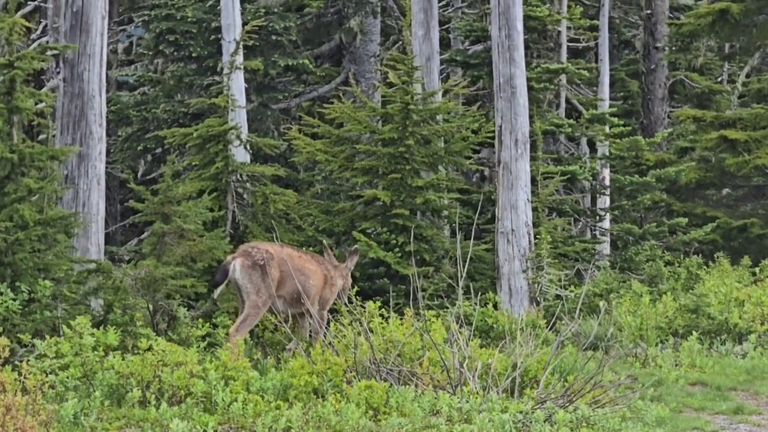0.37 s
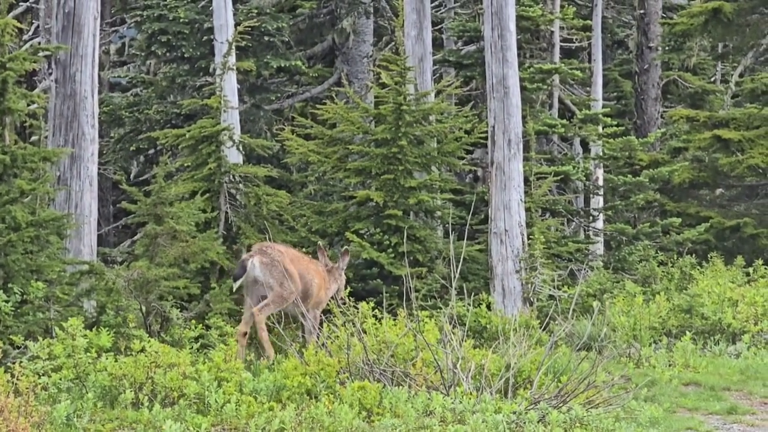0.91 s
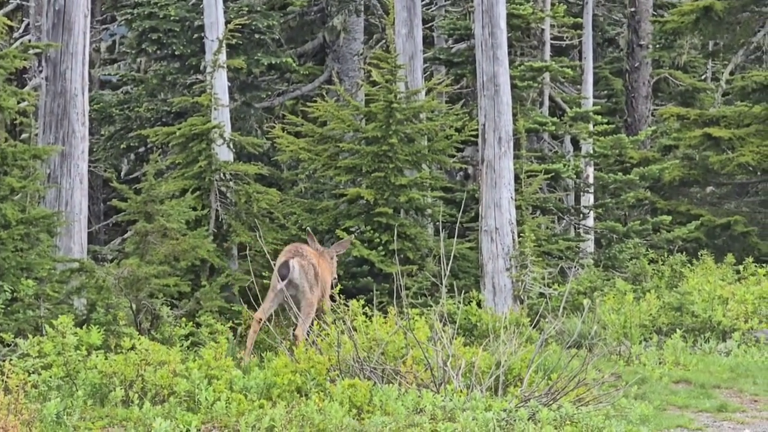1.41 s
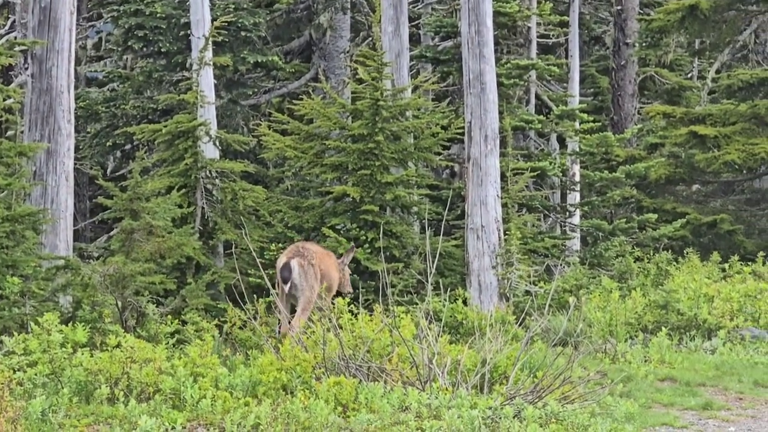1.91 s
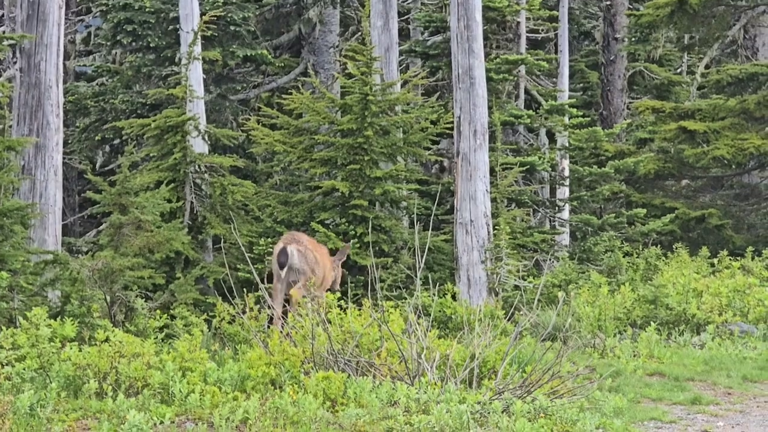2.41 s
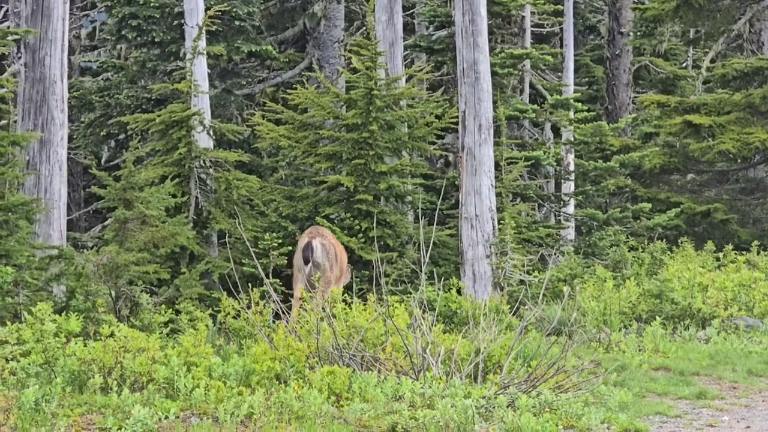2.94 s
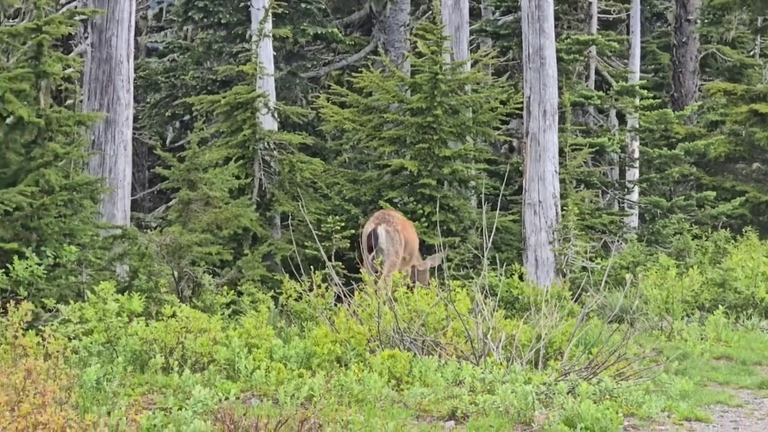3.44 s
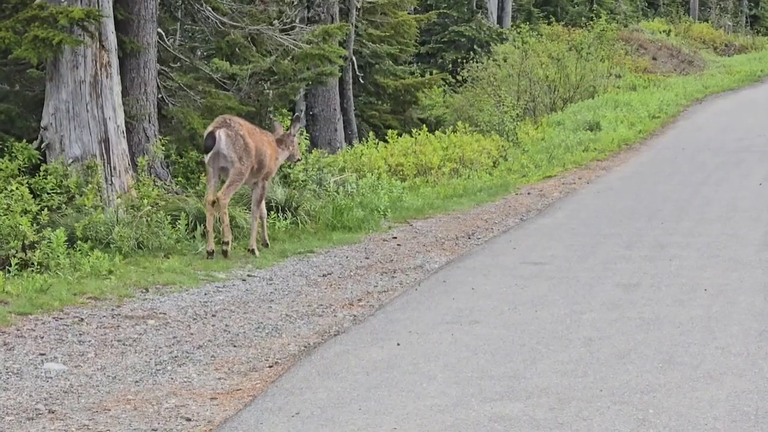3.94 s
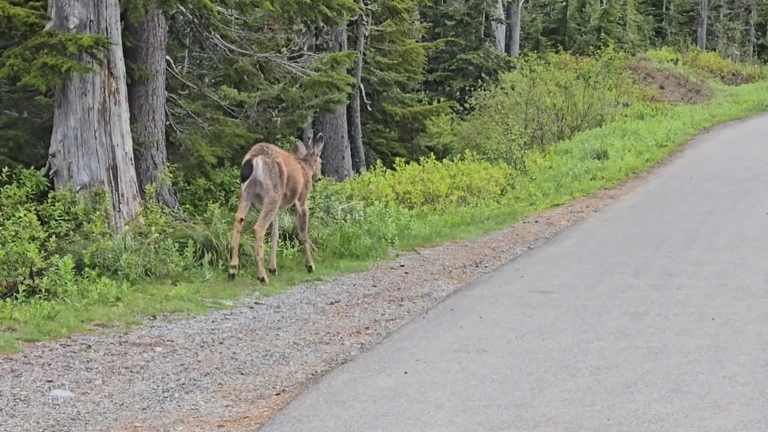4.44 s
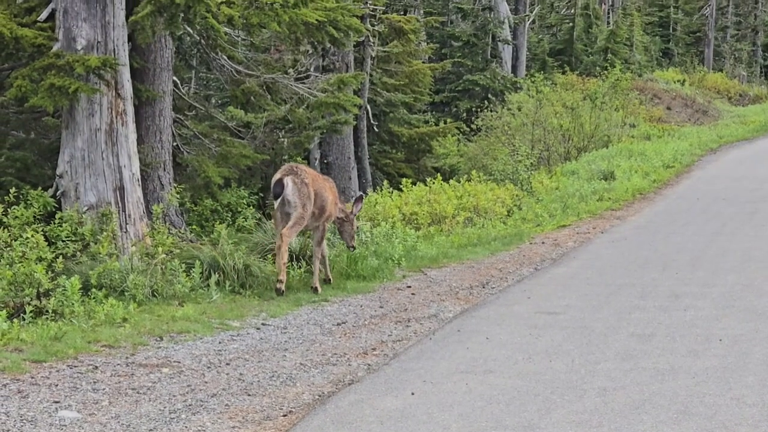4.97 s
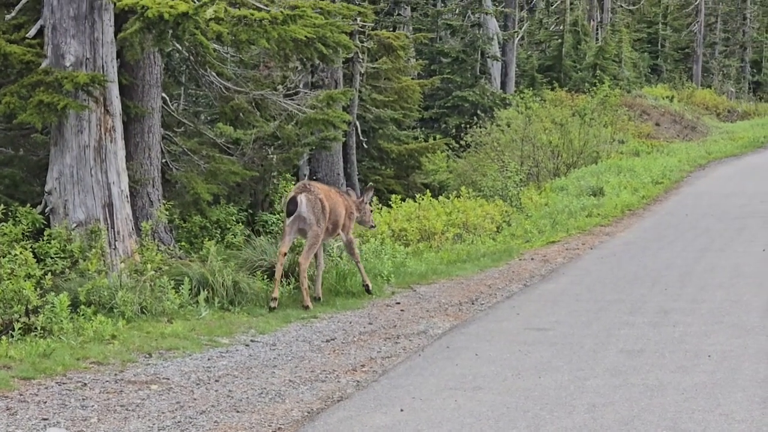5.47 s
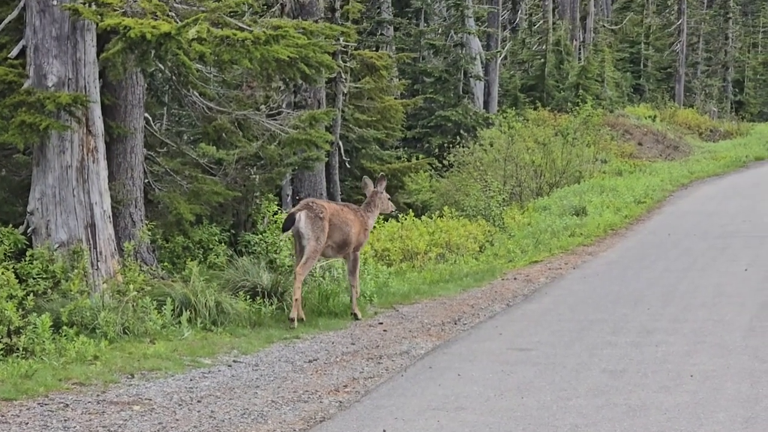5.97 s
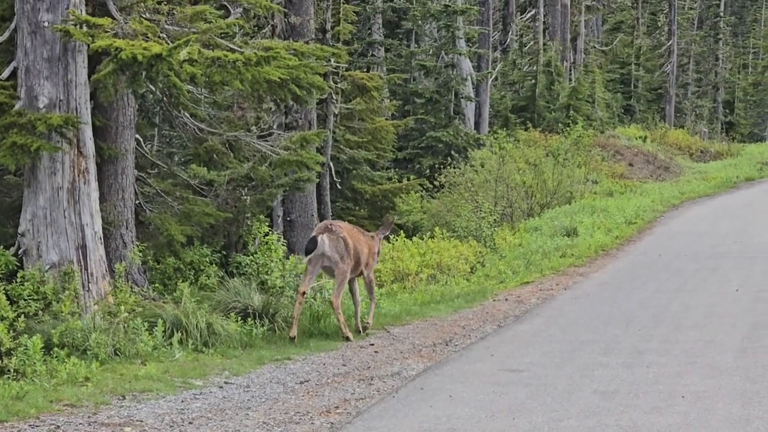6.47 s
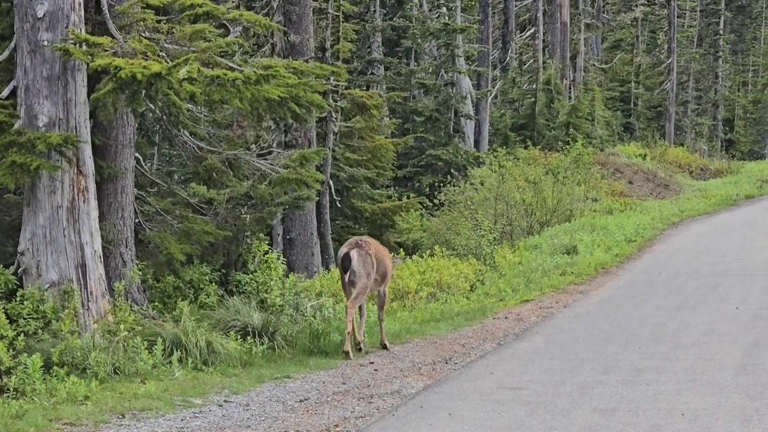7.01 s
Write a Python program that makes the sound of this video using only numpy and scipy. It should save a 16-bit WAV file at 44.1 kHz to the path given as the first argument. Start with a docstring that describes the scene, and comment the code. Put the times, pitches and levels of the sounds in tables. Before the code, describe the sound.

Outdoor stereo sound from a handheld device in two parts. First, steady close engine idling with rumble and breathy fan hiss, losing some top and bass when the device turns. A hard cut leaves a moment of silence. Then a hushed roadside with a soft hum, distant wash and barely audible high insect sounds, steadily overtaken by an approaching car's tyre rush, exhaust drone and low moans as it brakes.

```python
"""Two places beside a forest road, heard through a handset's two microphones, with silence between them.
First a parked vehicle idles close on the right: shaft orders, body roar, surging fan hiss and a belt whine.
The handset turns away at about 2 s, then sound stops. Next comes a quieter roadside with the same low hum;
the handset's wind filter cuts the bass for a moment more. A thin whistle, insect pips and a distant wash
surround a car that slows as it draws near from the right: shaped noise for tyres, sines for exhaust and moans."""
import sys
import numpy as np
from scipy import signal
from scipy.io import wavfile
from scipy.ndimage import uniform_filter1d

SR = 44100
rng = np.random.default_rng(int(sys.argv[2]) if len(sys.argv) > 2 else 0)


def undo_db(level):
    """Turn decibels back into plain size, where 20 dB means ten times bigger."""
    steps = np.asarray(level, float) / 20
    return 10 ** steps


def wrap_up_sound(samples):
    """Save the sound to the file named by the first command line argument, as 16-bit audio."""
    columns = np.atleast_2d(samples).T
    # keep every value between -1 and 1, then stretch to whole-number steps
    tamed = np.clip(columns, -1, 1)
    steps = np.round(tamed * 32767).astype(np.int16)
    wavfile.write(sys.argv[1], SR, steps)


N = 313992
HOP = 512  # samples between short-time spectra
T, FRAME_T = np.arange(N) / SR, np.arange(N // HOP + 5) * HOP / SR
HZ = np.fft.rfftfreq(4 * HOP, 1 / SR)[:, None]

# All source levels are ahead of the low cuts; lags are samples by which the left microphone hears later.
CUT_S, RESUME_S, WIND_FILTER_OFF_S = 3.549, 3.731, 4.0

# low hum at both places: pitch_hz, level_db (rms), width_hz (of each resonator pole)
HUM_LINES = [(35.2, -48, 3), (71.2, -56, 3)]

# distant wash, relative spectrum: pitch_hz, left_db, right_db, left_right_likeness (0-1)
WASH_SPECTRUM = [(18.1, -4.5, -14, 0.58), (35, -12, -14.5, 0.66), (99.5, -8, -6.5, 0.95),
                 (266, -9.5, -11.5, 1), (334, -17, -27, 0.9), (460, -23.5, -12, 0.16),
                 (690, -21, -30.5, 0.88), (1020, -22, -30, 0.39), (1380, -21.5, -22.5, 0.56),
                 (1980, -31.5, -33.5, 0.17), (2210, -34, -25, 0.3), (2540, -34, -31, 0.3),
                 (2840, -35, -25.5, 0.36), (3250, -33, -35, 0.3), (3650, -35, -31, 0.37),
                 (4200, -37, -36, 0.25), (6600, -44, -45.5, 0.12), (7800, -44, -44, 0.27),
                 (11500, -50, -61, .2), (12200, -45, -50, .3), (15700, -56, -68.5, .2)]
WASH_DB = -46
# insect on the right: start_s (peak 2 ms later), level_db (before the left-right offsets), pitch_hz
INSECT_PIPS = [(4.811, -62.5, 12230), (4.8718, -66, 12350), (4.9731, -62.5, 12230), (5.028, -69, 12000),
               (5.228, -68, 11850)]
# fainter pips at random: span, pitch range, loudest before the left-right offsets
FAINT_S, FAINT_HZ, FAINT_DB = (4.8, 5.32), (11650, 12900), -76.5
WHISTLE_HZ, WHISTLE_WANDER_HZ = 11625, 9  # middle pitch, rms wander
WHISTLE_DB, WHISTLE_FADE_DB_PER_S2 = -74.5, 0.4  # left level at the start of the second place

# idling vehicle, relative body spectrum: pitch_hz, left_db, right_db, left_right_likeness (0-1)
BODY_SPECTRUM = [(25.6, -2, -2, 0.95), (62, 3.5, 6, 0.8), (137, 5, 5.5, 1), (180, 6, 5, 0.93),
                 (237, 9.5, 9, 1), (302, 4.5, -1.5, 1), (362, 6.5, -5.5, 1), (428, -3.5, -2.5, 0.61),
                 (580, -4.5, -1, 1), (840, -5, -10.5, 0.98), (1050, -8, -5.5, 0.85), (1535, -7, -9, 0.98),
                 (1554, -9.5, -17, 0.9), (1700, -17.5, -14, 0.85), (2020, -11, -12, 0.89),
                 (2580, -16.5, -17, 0.81), (2850, -19.5, -18, 0.73), (3170, -18.5, -18, 0.88),
                 (3700, -22.5, -18.5, 0.6), (4440, -29.5, -20.5, 0.7), (4800, -27, -19.5, 0.36),
                 (5470, -27.5, -20.5, 0.6), (5850, -38, -25, 0.2), (6130, -33, -22.5, 0.7),
                 (6900, -32, -31, 0.4), (7490, -32.5, -26, 0.1), (7790, -41, -39, 0.3),
                 (9100, -72, -57, 0.2)]
ROAR_DB = -29  # ahead of the turn, rumble and notch
# fan hiss shaped by the handset's ports, relative: pitch_hz, left_db, right_db, left_right_likeness (0-1)
FAN_SPECTRUM = [(7500, -26.5, -29.5, 0.2), (8040, 3.5, -4, 0), (9740, -9, -2, 0.5), (10500, 0.5, -7, 0.3),
                (11400, -13, 3.5, .4), (11340, -12, 12.5, 0.3), (11930, -20.5, 6.5, .3),
                (12900, -31.5, 5.5, .3), (13900, -37, -6, .3), (14350, -30, 6, .2), (14900, -30, 0, 0),
                (15100, -28.5, -15, .3), (15700, -26, -24, 0.4)]
FAN_DB, SURGE_RISE_S, SURGE_FALL_S = -56, 0.037, 0.24  # level between surges, ahead of the notch
# surges of the fan hiss: start_s, hold_s (from start to fall), rise_db
FAN_SURGES = [(.15, 0.081, 2), (.92, .05, 2.5), (1.203, 0.57, 2.5)]
SHAFT_HZ = 23.2
# engine orders: multiple_of_shaft, level_db (rms)
SHAFT_ORDERS = [(2, -48), (3.85, -47), (5, -36.5), (6, -38), (9.5, -44), (9.9, -43), (10.93, -39.5),
                (12, -35.5), (14.93, -43), (17, -56), (18, -52), (19, -56), (24, -51.5)]
# narrow whines in the hiss: pitch_hz, width_hz (of each resonator pole), level_before_turn_db,
# level_after_turn_db (both midway between the microphones), left_minus_right_db
BELT_WHINES = [(5400, 69, -59, -67, -6), (6170, 140, -66, -65.5, 0.5), (7460, 140, -76, -79, 3),
               (8080, 90, -79, -85.5, -11.5)]
# the handset turns away once: the top dulls, the rumble drops, a notch of the right port slides down
TURN_START_S, TURN_END_S = 1.56, 2.44
UPPER_DB, RUMBLE_DB, NOTCH_HZ = (3, -1), (0.5, -15), (9700, 8530)  # (before, after the turn)
BODY_LAG = (7.92, 7.7)  # samples (before, after the turn)
# slow drift of the rumble, added to the effect of the turn: time_s, level_db
RUMBLE_DRIFT = [(0, 10), (1.1, -1), (2.9, -3), (3.55, 7)]

# the car slows as it draws near; its modelled distance shrinks, evenly braked, until the sound ends
BRAKE_CURVE_END_S, BRAKE_M_PER_S2, NEAREST_M = 7.523, 4.8, 3.27  # the curve's end lies past the last sound
CAR_DB, CAR_BASS_DB = -32.5, -0.5  # roar level at NEAREST_M ahead of shaping; offset of its bass
# tyre roar, relative: pitch_hz, left_db, right_db, left_right_likeness (0-1, ahead of the likeness factor)
TYRE_SPECTRUM = [(18, -11, -20.5, .9), (41.1, -5, -5, 0.92), (90.7, -1.5, -5, 0.95), (230, -8, -5.5, 0.94),
                 (380, -9, -8, 0.99), (585, -11, -12, 1), (920, -11.5, -9.5, 1), (1020, -13, -11, 0.96),
                 (1260, -12, -11.5, 1), (1620, -14.5, -13.5, 1), (1850, -17, -17.5, 0.74),
                 (1960, -17, -11.5, 0.59), (2350, -18.5, -22, 0.31), (2610, -25.5, -17, 0.5),
                 (2790, -17.5, -21, 0.45), (3300, -29.5, -20, 0.32), (3870, -20.5, -22, 0.63),
                 (4400, -33, -23, 0.62), (4840, -23, -23, 0.49), (5950, -36.5, -25.5, 0.6),
                 (6300, -28, -28.5, 0.67), (6800, -28.5, -30.5, 0.64), (7360, -32, -25.5, 0.5),
                 (8200, -35, -27, 0.14), (11200, -42, -35.5, 0.27), (16000, -42.5, -34, .25)]
# boost of the roar around its core band: time_s, left_db, right_db
CORE_BOOST = [(3.73, -2, 3), (4.8, 1, -1), (5.6, 3, 0.5), (6.0, 1.5, 3), (6.25, 2, 2.5), (6.4, 4, 6),
              (6.7, 0.5, 2.5), (7.12, -0.5, -3)]
CORE_HZ, CORE_WIDTH_HZ = 1680, 470
# brightness of the roar above 1 kHz: time_s, slope_db_per_octave
BRIGHTNESS = [(3.73, -13.5), (4.2, -3.5), (4.55, -1.5), (4.9, -1), (5.3, -1.5), (5.7, -2), (6.1, -0.5),
              (6.25, -1), (6.4, 0.3), (6.6, 0), (6.85, 0.34), (7.12, 0)]
# bearing: time_s, treble_lag_samples, bass_lag_samples (bass bends round the handset)
CAR_BEARING = [(3.73, 2.5, 4), (4.5, 3.5, 5), (5.0, 5, 6), (5.65, 6, 9), (6.0, 10, 15), (6.3, 13, 19),
               (6.6, 18, 20.5), (6.9, 22, 21.5), (7.12, 21, 21)]
BEND_HZ = 1990
# how alike the roar is at the two microphones; the treble varies and is most alike near 6.9 s:
# time_s, treble_likeness_factor, bass_likeness_factor
CAR_LIKENESS = [(3.73, 0.5, 1), (5.3, 0.51, 1), (5.8, 0.97, 0.82), (6.2, 0.32, 0.89), (6.5, 0.66, 0.9),
                (6.75, 1.3, 0.87), (6.9, 1.5, 0.95), (7.12, 0.94, 0.7)]
LIKENESS_SPLIT_HZ = 1300
# a hollow in the roar: time_s, pitch_hz, level_db
ROAR_HOLLOW = [(5.7, 1100, 0), (6.1, 1080, -4), (6.4, 1160, -5), (6.7, 1080, -4.5), (7.12, 1150, -3)]
HOLLOW_WIDTH_HZ = 130
# the side echo: extra path at the right microphone, loss of treble, own bearing (samples), share of the roar
ECHO_MS, ECHO_DULL_HZ, ECHO_LAG, ECHO_SHARE = 1.33, 3000, 8.9, 0.33
ECHO_GONE_LAG, ECHO_FADE_LAG = 21.1, 2.4  # roar's lag at which the echo is gone, span of its fade (samples)
# exhaust: it holds its pitch, then sinks to idle; it is loudest just as it starts to sink
NOTE_HZ, NOTE_SAG_S, NOTE_SAG_HZ_PER_S, NOTE_IDLE_HZ = 91, 6.82, 75, 75.5
NOTE_DB, NOTE_SWELL_DB_PER_S, NOTE_FADE_DB_PER_S = -42, 4.5, 38
# short low moans of the slowing car: middle_s, length_s, pitch_hz, level_db (rms at the middle)
CAR_MOANS = [(6.4, .6, 366, -53), (6.85, .5, 212, -46), (7.0, .3, 308, -48), (6.65, .5, 35, -44)]


def evened(x):
    """Scales to rms 1."""
    return x / np.sqrt(np.mean(abs(x) ** 2) + 1e-20)


def curve(rows, t):
    """The columns of a table joined by straight lines in time."""
    s, *columns = np.transpose(rows)
    return [np.interp(t, s, c) for c in columns]


def ramp(t, start, end):
    """Rises from 0 to 1."""
    return np.clip((t - start) / (end - start), 0, 1)


def noise(table, lag, patchy_db, colour=1, likeness=1):
    """Random short-time spectra at two microphones, near rms 1 before colour; likeness scales the shared part."""
    hz, *columns = np.transpose(table)
    left_db, right_db, same = (np.interp(np.log(HZ + 1), np.log(hz + 1), c) for c in columns)
    a, b, c, d, patches = rng.standard_normal((len(FRAME_T), len(HZ), 5)).T
    patches = evened(uniform_filter1d(uniform_filter1d(patches, 20, 0), 8, 1))
    same = np.clip(same * likeness, 0, 1)
    right = a + 1j * b
    delayed = right * np.exp(-2j * np.pi * HZ * lag / SR)
    left = same * delayed + np.sqrt(1 - same ** 2) * (c + 1j * d)
    shape = undo_db(np.array([left_db, right_db])) * (HZ >= hz[0])
    shape /= np.sqrt(np.mean(shape ** 2) * 4 * HOP / 3)
    spectra = np.array([left, right]) * shape * undo_db(patchy_db * patches) * colour
    return signal.istft(spectra, nperseg=4 * HOP, noverlap=3 * HOP)[1][:, :N]


def tone(hz, width_hz, fuzz, lag):
    """A line of rms about 1: steady part plus a power share (fuzz) of narrow noise, delayed on the left."""
    r = np.exp(-np.pi * width_hz / SR)
    waver = evened(signal.lfilter([1], [1, -2 * r, r * r], rng.standard_normal((2, N)), axis=1))
    fuzz = np.clip(fuzz, 0, 1)
    size = np.sqrt(1 - fuzz) + np.sqrt(fuzz) * (waver[0] + 1j * waver[1]) / np.sqrt(2)
    phase = 2 * np.pi * (np.cumsum(hz * np.ones(N)) / SR + rng.random())
    delay = 2 * np.pi * hz * np.array([[1], [0]]) * lag / SR
    return np.sqrt(2) * np.real(size * np.exp(1j * (phase - delay)))


def hum():
    """A steady low hum: partly noisy lines that swell and sag a little."""
    return sum(undo_db(db) * tone(hz, width_hz, fuzz=0.2, lag=8) for hz, db, width_hz in HUM_LINES)


def wash():
    """Distant wash: patchy noise, least alike at the two microphones in the treble."""
    return noise(WASH_SPECTRUM, lag=3.0, patchy_db=0.9, colour=undo_db(WASH_DB))


def whistle():
    """A thin, slowly wandering line from the left that drifts towards the middle as it fades."""
    since = np.maximum(T - RESUME_S, 0)
    wander = uniform_filter1d(uniform_filter1d(rng.standard_normal(N), size=1600), size=1600)
    hz = WHISTLE_HZ + WHISTLE_WANDER_HZ * evened(wander)
    left_db = WHISTLE_DB - WHISTLE_FADE_DB_PER_S2 * since ** 2
    right_db = left_db - 11 + 7 * ramp(T, 4.4, 5.0)
    return undo_db([left_db, right_db]) * tone(hz, width_hz=30, fuzz=0.3, lag=-2.2)


def insect():
    """Pips, each a sine in a bell-shaped envelope a few milliseconds long, stronger on the right."""
    chance = rng.random((260, 3))
    start_s = FAINT_S[0] + (FAINT_S[1] - FAINT_S[0]) * chance[:, 0]
    level_db = FAINT_DB - 8 * chance[:, 1]
    pitch_hz = FAINT_HZ[0] + (FAINT_HZ[1] - FAINT_HZ[0]) * chance[:, 2]
    out = np.zeros((2, N))
    for s, db, hz in [*INSECT_PIPS, *zip(start_s, level_db, pitch_hz)]:
        t = T - s - 0.002
        bell = np.exp(-(t / 0.0028) ** 2)
        out += undo_db(db + np.array([[-12], [6]])) * bell * np.sin(2 * np.pi * hz * t)
    return out


def turned(pair, t):
    """A value that slides from before to after the turn of the handset."""
    return pair[0] + (pair[1] - pair[0]) * ramp(t, TURN_START_S, TURN_END_S)


def port_notch_db():
    """A narrow loss at the right port only, sliding down as the handset turns."""
    depth_db = np.array([0, -22])[:, None, None]
    return depth_db * np.exp(-((HZ - turned(NOTCH_HZ, FRAME_T)) / 380) ** 2)


def fan_hiss():
    """Air noise of the fan, with surges that rise fast, hold and ebb."""
    level_db = FAN_DB
    for s, hold, db in FAN_SURGES:
        rise = ramp(FRAME_T, s, s + SURGE_RISE_S)
        fall = ramp(FRAME_T, s + hold, s + hold + SURGE_FALL_S)
        level_db = level_db + db * (rise - fall)
    return noise(FAN_SPECTRUM, lag=3.8, patchy_db=1.2, colour=undo_db(level_db + port_notch_db()))


def belt_whine():
    """Narrow noise bands whose levels slide with the turn of the handset."""
    out = np.zeros((2, N))
    for hz, width_hz, *level_db, side_db in BELT_WHINES:
        whine_db = turned(level_db, T) + side_db * np.array([[0.5], [-0.5]])
        out += undo_db(whine_db) * tone(hz, width_hz, fuzz=1, lag=8)
    return out


def shaft_orders():
    """Wavering lines at multiples of the shaft's turning rate."""
    return sum(undo_db(db) * tone(multiple * SHAFT_HZ, width_hz=18, fuzz=0.4, lag=8)
               for multiple, db in SHAFT_ORDERS)


def body_roar():
    """Broad roar of the vehicle's body; the turn of the handset dulls its top and drops its rumble."""
    upper = 1 / (1 + (3000 / (HZ + 1)) ** 6) / (1 + (HZ / 6000) ** 8)
    upper = upper - np.exp(-((HZ - 2200) / 400) ** 2)  # what the top loses, the band below gains
    lower = 1 / (1 + (HZ / 60) ** 4)
    rumble_db = turned(RUMBLE_DB, FRAME_T) + curve(RUMBLE_DRIFT, FRAME_T)[0]
    level_db = ROAR_DB + turned(UPPER_DB, FRAME_T) * upper + rumble_db * lower + port_notch_db()
    return noise(BODY_SPECTRUM, lag=turned(BODY_LAG, FRAME_T), patchy_db=0.57, colour=undo_db(level_db))


def distance_m(t):
    """Modelled distance from the handset to the evenly braked car."""
    left_on_curve_s = np.clip(BRAKE_CURVE_END_S - t, 0, BRAKE_CURVE_END_S - RESUME_S)
    return np.hypot(NEAREST_M, BRAKE_M_PER_S2 / 2 * left_on_curve_s ** 2)


def car_tones(lag):
    """Exhaust note that holds, then sinks and fades, plus moans that swell and die."""
    before, after = np.maximum(NOTE_SAG_S - T, 0), np.maximum(T - NOTE_SAG_S, 0)
    note_hz = np.maximum(NOTE_HZ - NOTE_SAG_HZ_PER_S * after, NOTE_IDLE_HZ)
    note_db = NOTE_DB - NOTE_SWELL_DB_PER_S * before - NOTE_FADE_DB_PER_S * after
    out = undo_db(note_db) * tone(note_hz, width_hz=8, fuzz=0.2, lag=lag)
    for s, length, hz, db in CAR_MOANS:
        swell = undo_db(db) * np.exp(-(2 * (T - s) / length) ** 2)
        out += swell * tone(hz, width_hz=8, fuzz=0.5, lag=lag)
    return out


def side_echo(lag):
    """A dulled later copy that combs the roar; it fades as the direct roar takes over."""
    share = ECHO_SHARE * np.clip((ECHO_GONE_LAG - lag) / ECHO_FADE_LAG, 0, 1)
    on_left = np.array([1, 0])[:, None, None]
    late_s = ECHO_MS / 1000 + on_left * (ECHO_LAG - lag) / SR
    return 1 + share * np.exp(-HZ / ECHO_DULL_HZ - 2j * np.pi * HZ * late_s)


def car():
    """Tyre roar grows with nearness, brightens and swings right; exhaust and moans follow its bass bearing."""
    treble_lag, bass_lag = curve(CAR_BEARING, FRAME_T)
    lag = treble_lag + (bass_lag - treble_lag) / (1 + (HZ / BEND_HZ) ** 8)
    level_db = CAR_DB - 20 * np.log10(distance_m(FRAME_T) / NEAREST_M)
    tilt_db = curve(BRIGHTNESS, FRAME_T)[0] * np.log2(np.maximum(HZ / 1000, 1))
    bass_db = CAR_BASS_DB / (1 + (HZ / 300) ** 4)
    core_db = np.array(curve(CORE_BOOST, FRAME_T))[:, None] * np.exp(-((HZ - CORE_HZ) / CORE_WIDTH_HZ) ** 2)
    hollow_hz, hollow_db = curve(ROAR_HOLLOW, FRAME_T)
    hollow_db = hollow_db * np.exp(-((HZ - hollow_hz) / HOLLOW_WIDTH_HZ) ** 2)
    colour = undo_db(level_db + tilt_db + bass_db + core_db + hollow_db) * side_echo(lag)
    treble_like, bass_like = curve(CAR_LIKENESS, FRAME_T)
    likeness = treble_like + (bass_like - treble_like) / (1 + (HZ / LIKENESS_SPLIT_HZ) ** 8)
    likeness = likeness + (1 - likeness) / (1 + (HZ / 250) ** 4)  # the factor nears 1 in the deep bass
    roar = noise(TYRE_SPECTRUM, lag, patchy_db=0.35, colour=colour, likeness=likeness)
    return roar + car_tones(np.interp(T, FRAME_T, bass_lag))


def scene():
    """The idling vehicle, a hard stop, silence, then the roadside with a short fade-in."""
    first = T < CUT_S
    second = np.clip((T - RESUME_S) / 0.01, 0, 1)
    low = hum()
    idling = fan_hiss() + belt_whine() + shaft_orders() + body_roar()
    roadside = wash() + whistle() + insect() + car()
    return first * (idling + low) + second * (roadside + low)


def roll_off(x):
    """The treble ends steeply here."""
    return signal.sosfilt(signal.butter(12, 15750, fs=SR, output="sos"), x)


def record(dry):
    """The handset's gentle low cut against wind switches off; a steep subsonic cut stays; the gap is muted."""
    wind_cut = signal.sosfilt(signal.butter(1, 250, "high", fs=SR, output="sos"), dry)
    filter_on = np.clip((WIND_FILTER_OFF_S - T) / 0.01, 0, 1)
    mixed = filter_on * wind_cut + (1 - filter_on) * dry
    mixed = signal.sosfilt(signal.butter(4, 24, "high", fs=SR, output="sos"), mixed)
    sounding = np.clip((CUT_S - T) / 0.002, 0, 1) + (T > RESUME_S)
    return roll_off(mixed * sounding)


dry = scene()
out = record(dry)
wrap_up_sound(out)
```